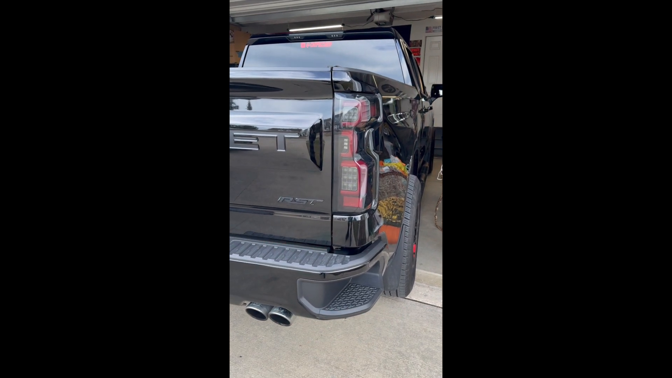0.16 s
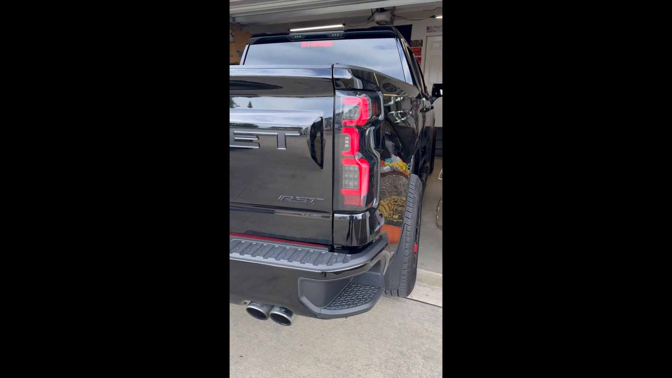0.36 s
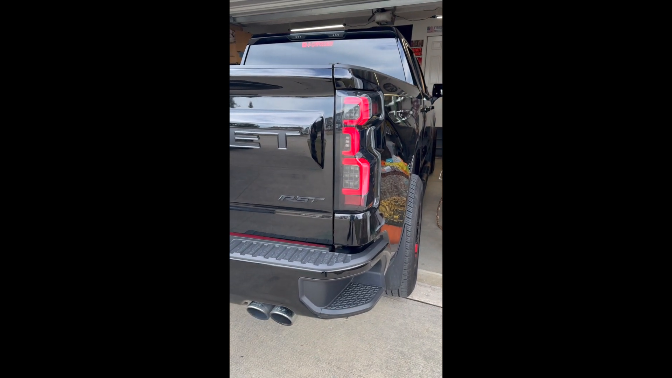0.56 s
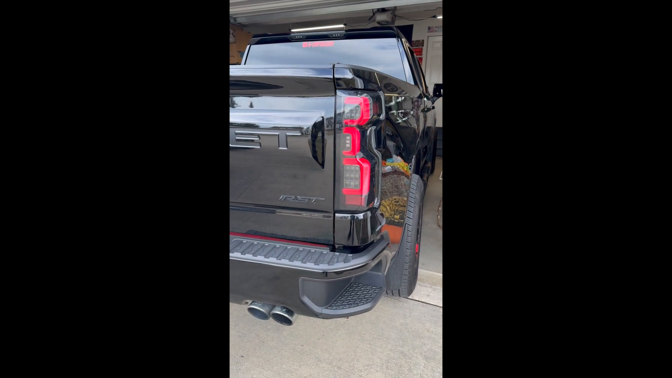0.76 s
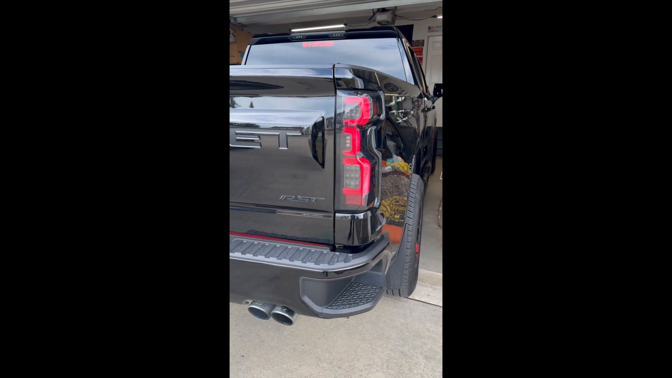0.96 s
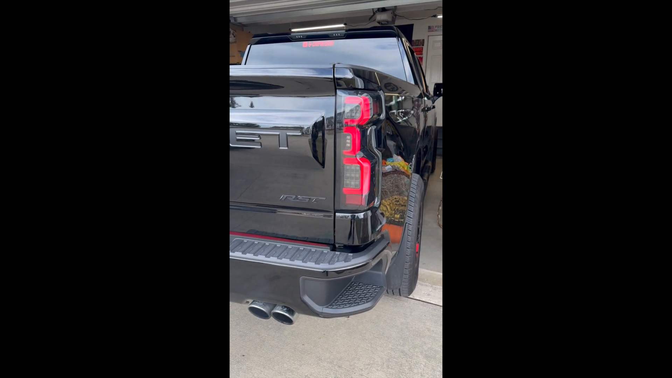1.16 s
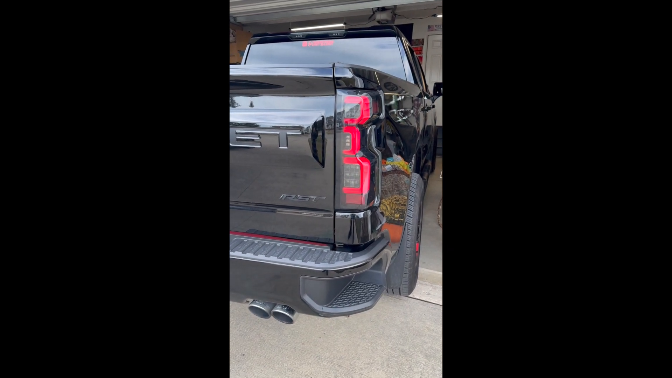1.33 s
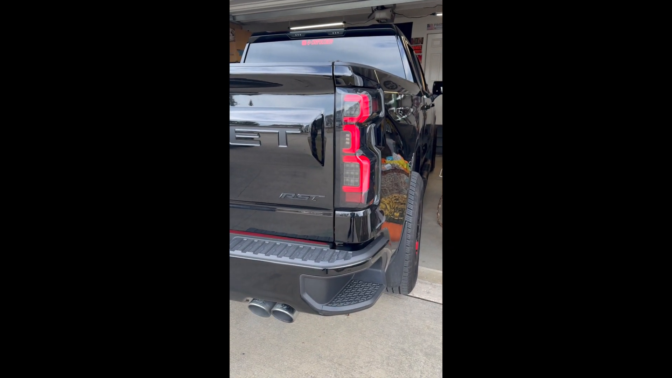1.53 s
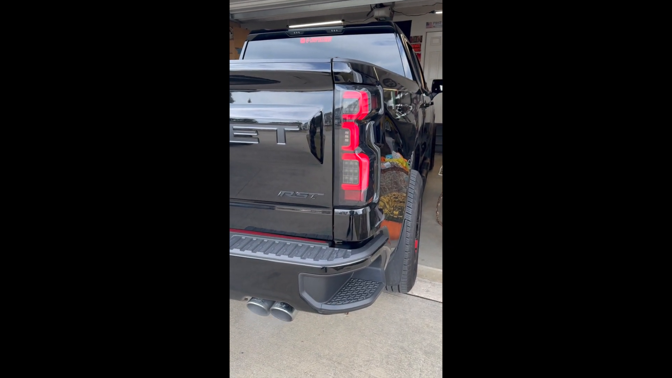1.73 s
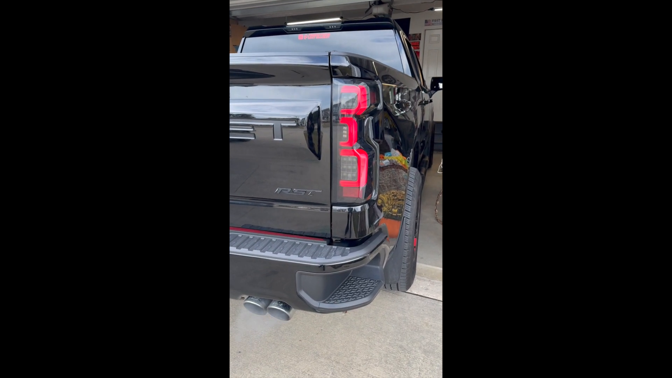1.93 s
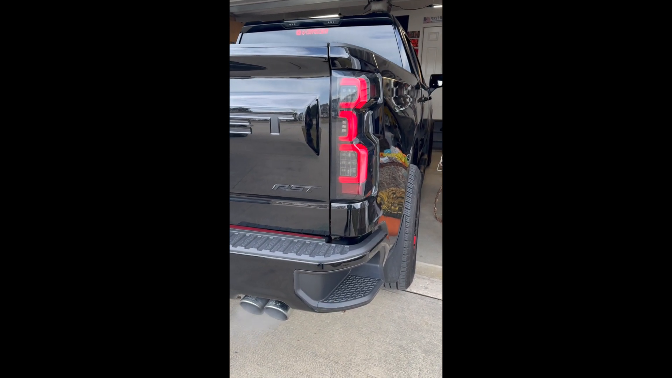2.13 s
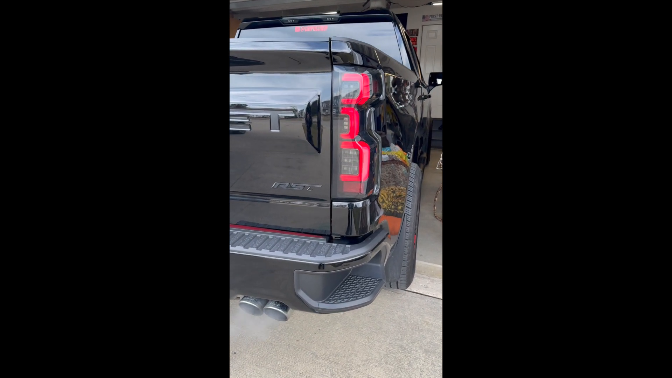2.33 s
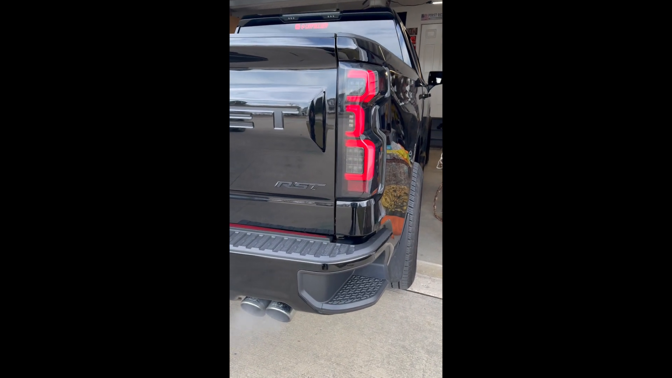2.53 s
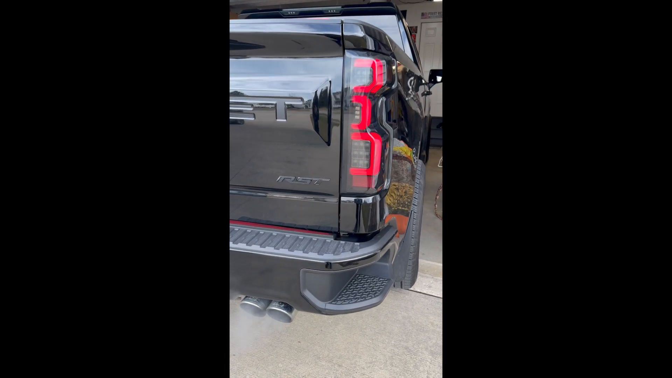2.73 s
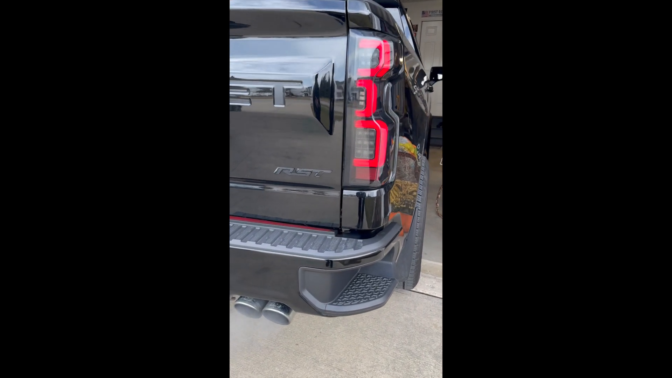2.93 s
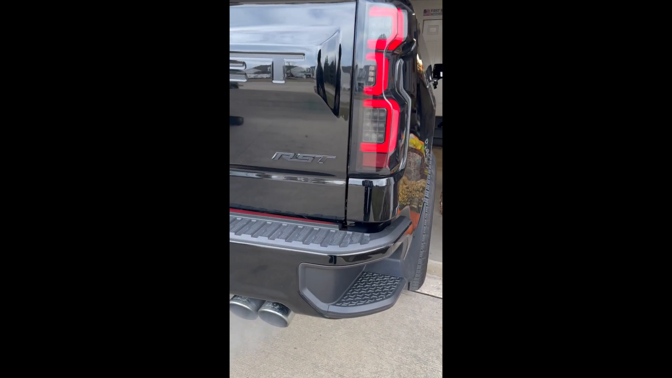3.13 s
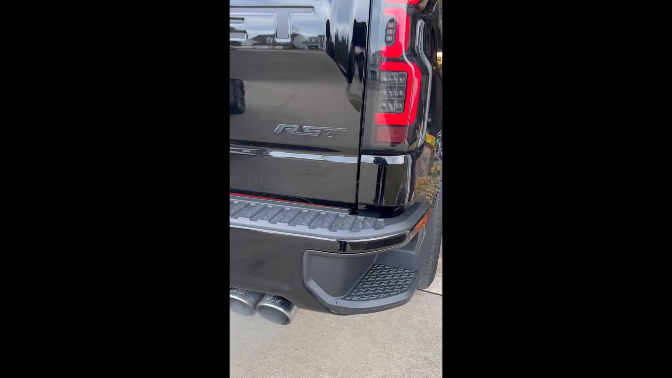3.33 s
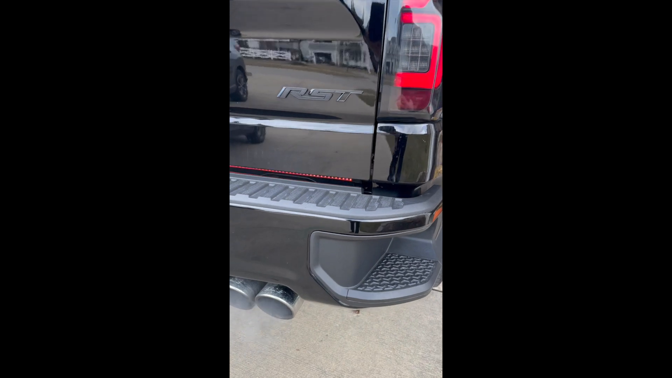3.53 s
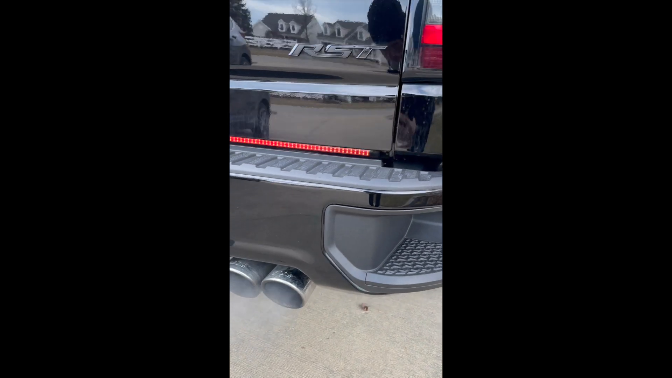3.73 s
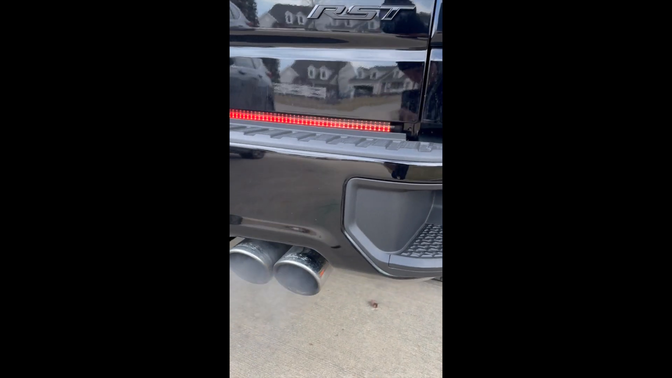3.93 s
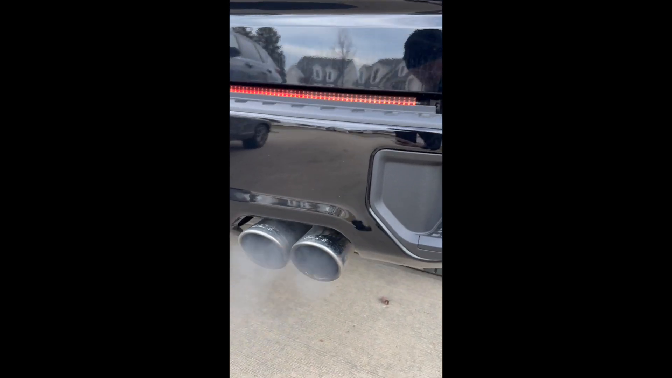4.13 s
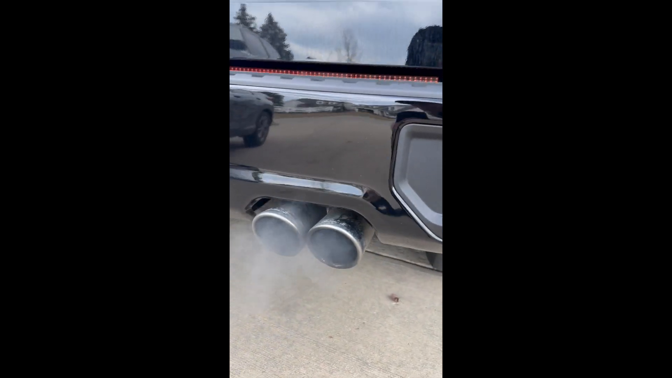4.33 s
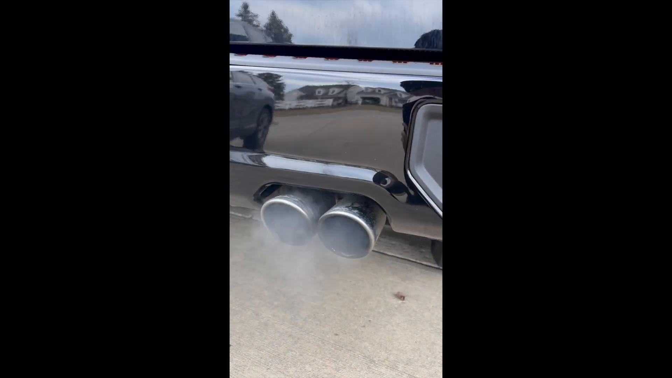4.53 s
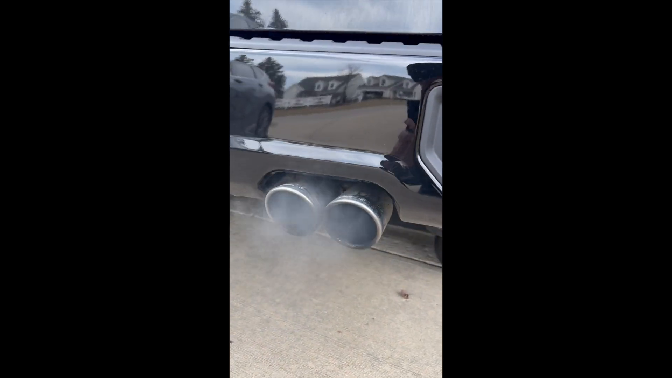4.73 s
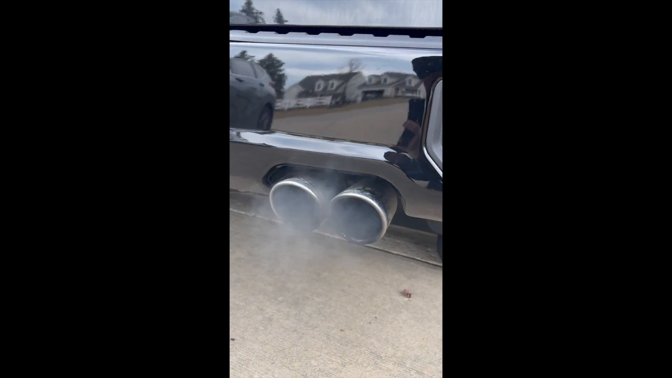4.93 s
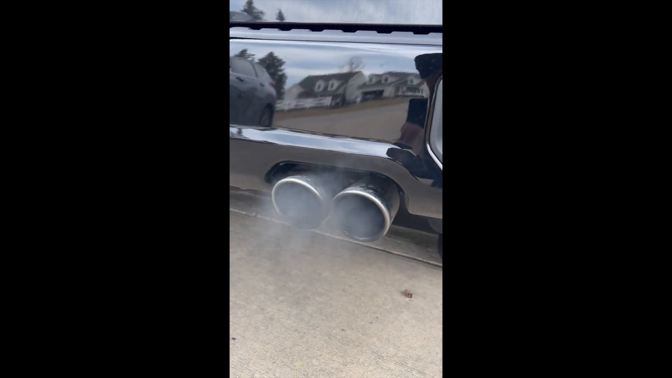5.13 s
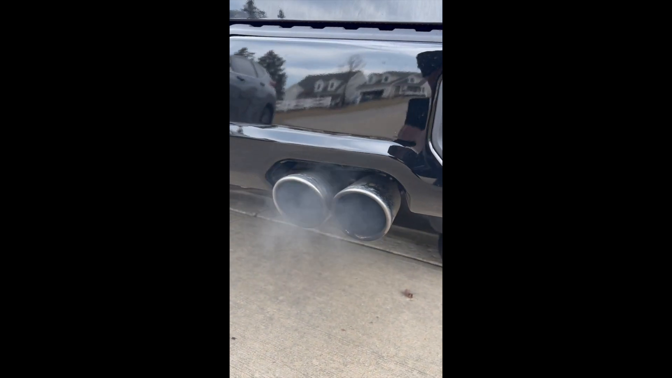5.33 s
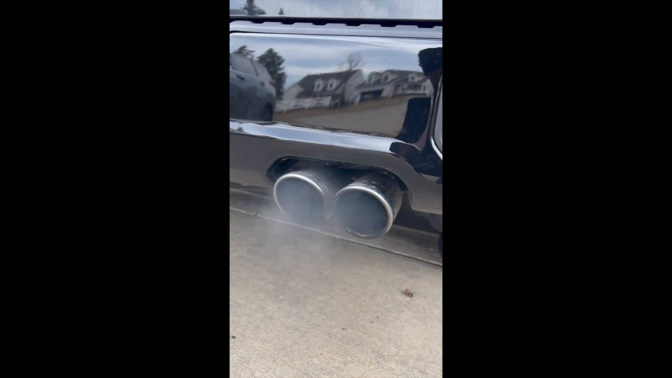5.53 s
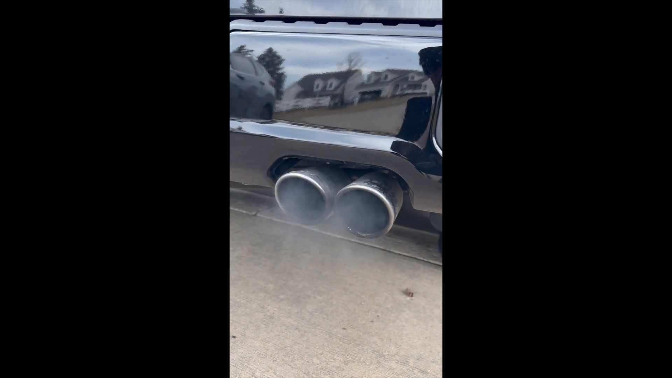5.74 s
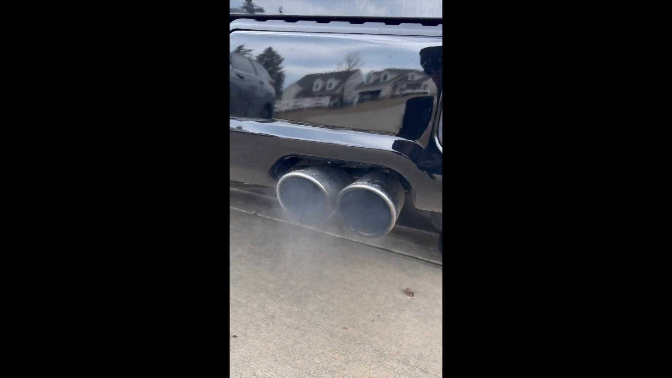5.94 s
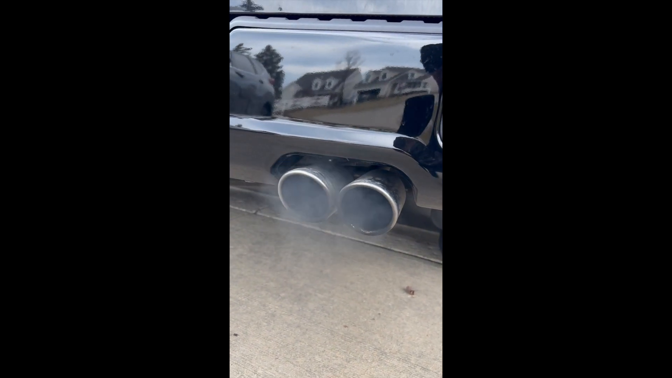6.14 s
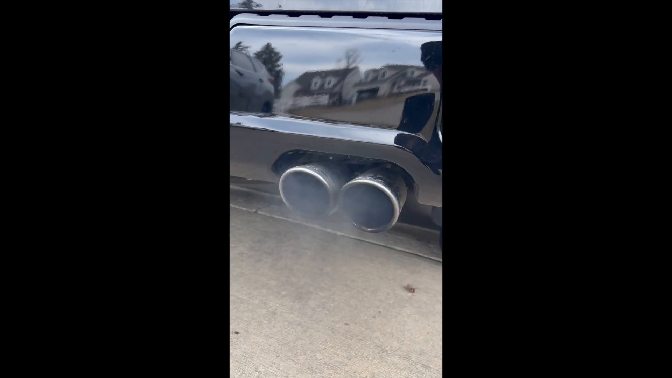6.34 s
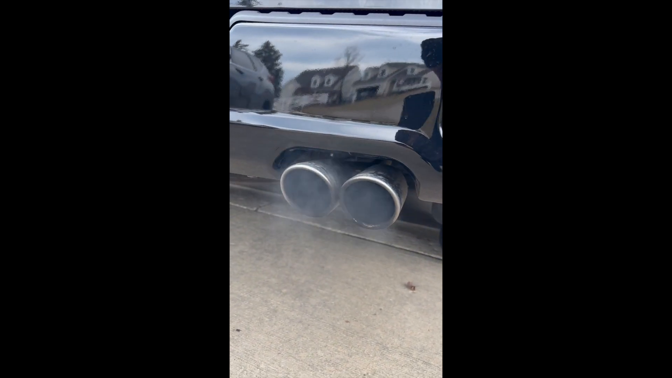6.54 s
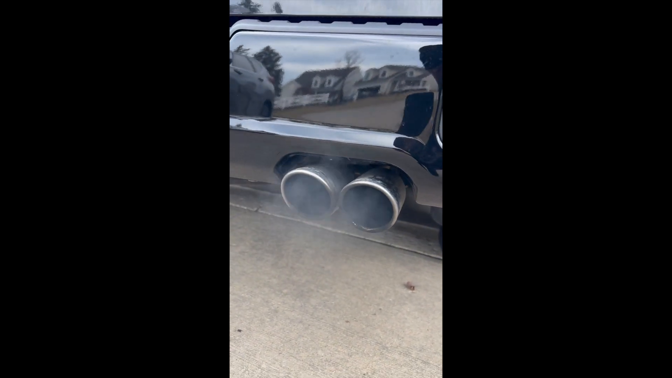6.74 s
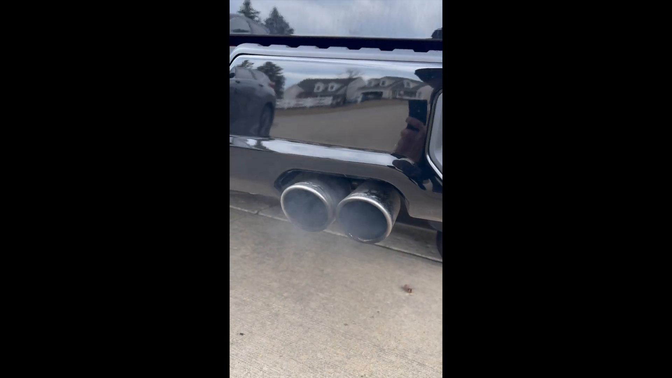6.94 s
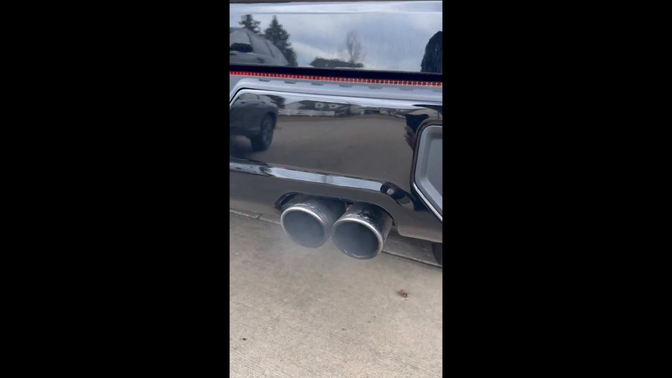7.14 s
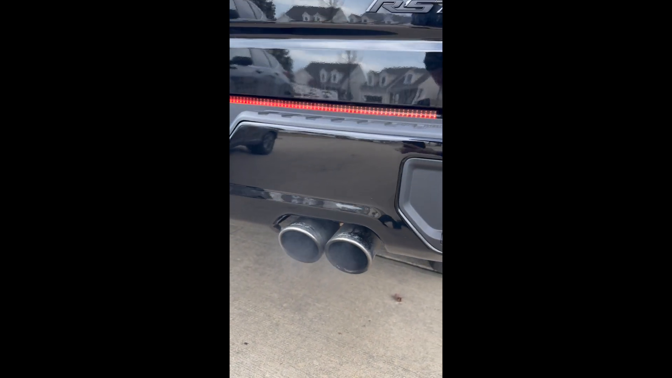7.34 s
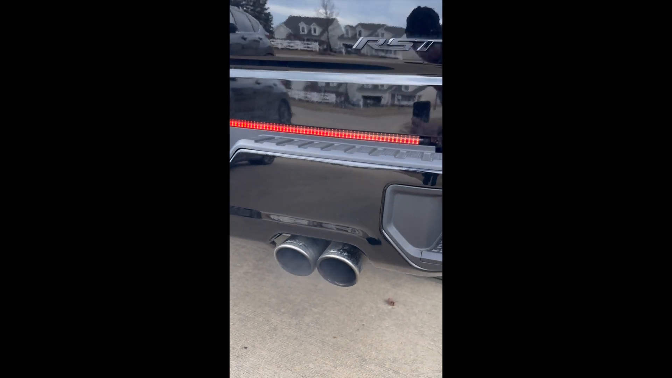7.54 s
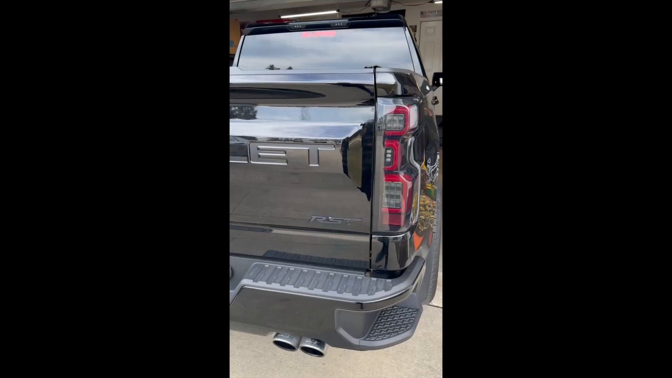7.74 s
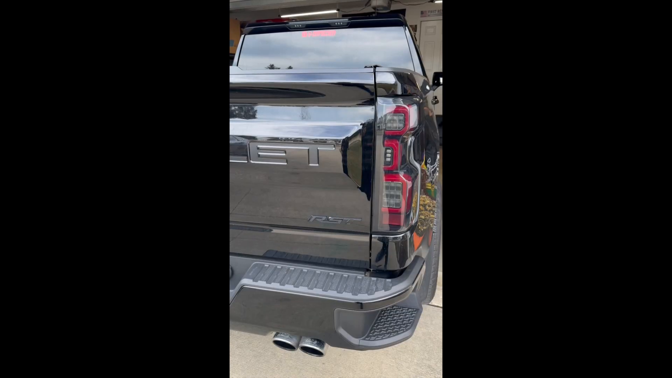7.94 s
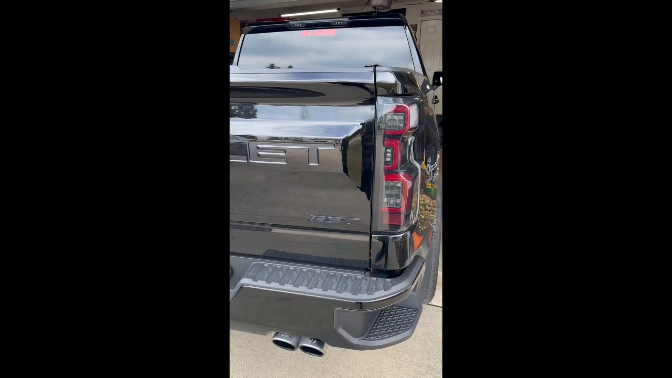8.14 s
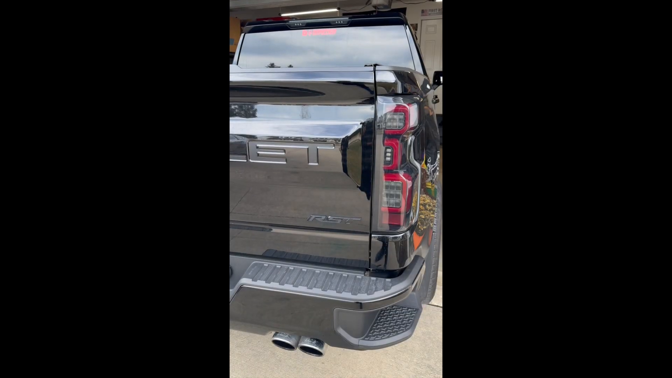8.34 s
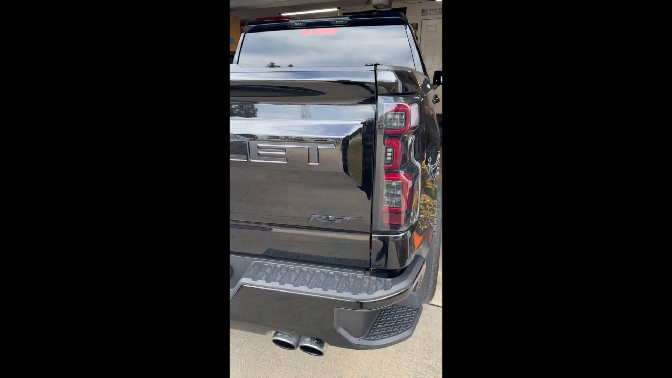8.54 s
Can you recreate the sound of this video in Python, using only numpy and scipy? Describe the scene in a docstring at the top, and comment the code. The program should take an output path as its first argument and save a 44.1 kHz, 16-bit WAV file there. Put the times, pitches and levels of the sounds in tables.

```python
"""A brief starter whirr, then a cold V8 catches, stumbles, flares and settles to a fast idle by an open
garage. Each firing strikes the twin tail pipes, which drone, bark and crack over deep tones; the gas
leaves in rasping, hissing puffs. The listener steps up to the pipes and back. At 7.7 s the engine sound
stops dead and only a low outdoor rumble is left."""
import sys
import numpy as np
from scipy import signal
from scipy.fft import rfft, irfft
from scipy.io import wavfile
from scipy.ndimage import uniform_filter1d

SR = 44100
rng = np.random.default_rng(int(sys.argv[2]) if len(sys.argv) > 2 else 0)


def wav_record(signal):
    """Record a signal, one row per channel, as 16-bit PCM in the file named by sys.argv[1]."""
    frames = np.transpose(np.atleast_2d(signal))
    bounded = np.clip(frames, -1, 1)
    # unit amplitude maps onto the largest positive 16-bit level
    quanta = np.round(bounded * 32767).astype(np.int16)
    wavfile.write(sys.argv[1], SR, quanta)


N = 382788
T = np.arange(N) / SR
HZ = np.maximum(np.arange(N // 2 + 1) * SR / N, 1)
CATCH_S, STOP_S = 0.085, 7.704
MEAN_BARK_DB, IDLE_SPREAD_DB, FLARE_SPREAD_DB = -20, .7, 1.5

# The crankshaft's rev and settle. Each row: time in seconds, speed in rpm.
CRANK_SPEED = [(0.08, 1333.6), (0.16, 1516.3), (0.26, 1569.7), (0.4, 1717.1), (0.55, 1750.6),
               (0.75, 1695.1), (1.08, 1604.4), (1.35, 1610.9), (1.6, 1615.2), (1.85, 1551.5), (2.3, 1528.8),
               (3, 1505.5), (3.7, 1484.8), (4.7, 1455.6), (5.15, 1458.3), (5.9, 1436.7), (6.6, 1418.4),
               (7.71, 1409.0)]
# The bark's fader ride: stumble, flare, walk up and back. Each row: time in seconds, level in dB.
BARK_RIDE = [(0.1, -17.5), (0.14, -12.5), (0.18, -10.5), (0.225, -19), (0.25, -11.5), (0.55, -16),
             (0.95, -20), (1.2, -25.5), (1.9, -27.5), (2.55, -26.5), (3.25, -23.5), (3.95, -18),
             (4.5, -16.5), (5.35, -18), (6.75, -20), (7.45, -24), (7.65, -27)]
# The blend of pipe colours. Each row: time in seconds, share of flare, share of close-up.
COLOUR_BLEND = [(.7, 1, 0.05), (1.2, 0.039, 0.37), (2.8, 0.31, 0.016), (4.1, 0.76, 0.54), (7.0, 0.21, 1),
                (7.7, 0.6, 0.63)]
# The stumbling first firings. Each row: start in seconds, dB over an idle firing.
CATCH_POPS = [(0.085, 7), (0.106, 2), (0.137, 4), (0.196, 6), (0.235, 9), (0.263, 5), (0.303, 0),
              (0.322, 1), (0.347, 8), (0.392, 2), (0.417, 5), (0.462, 1), (0.479, 4)]
# One entry per cylinder in firing order: its bank, 1 or 2; the shift in ms that its unequal pipe gives
# its pulse; its shift in ms at the hollow, long-ringing modes.
BANK = [1, 2, 2, 1, 2, 1, 1, 2]
HEADER_MS = [.8, -.3, .3, -.4, .4, .6, -1, .4]
HOLLOW_MS = [-4.2, -2.1, -3.1, -.4, -3.7, -1.5, -1.3, -.7]
# The pipe's ring. Each row: pitch in Hz, width in Hz, relative dB in the flare, from afar, close up.
PIPE_MODES = [(138.9, 14, 7, 5.5, 7.5), (175.8, 13, 10, 8.5, 6.5), (207.2, 5.4, 15, 4, -7.5),
              (242.4, 9.5, 7, -3, -4.5), (282.8, 9.9, 10.5, 12, 5.5), (345.6, 12, 12.5, 20, 14),
              (414.6, 13.4, 16, 22, 23), (496, 7.6, 18, 11, 23.5), (551.8, 17, 3.5, 12, 12.5),
              (620.4, 70, 1.5, 4, 7.5), (565, 43, 2, 9, 0.5), (725, 210, 1.5, 5.5, 5.5),
              (812, 71, 12.5, 17.5, 8.5), (915, 380, -4, 4.5, -15.5), (1318, 520, -6.5, 9, 0),
              (1360, 37, 2.5, 13.5, 11), (1493, 44, -10.5, -6, -0.5), (1895, 210, 0.5, 4, -12.5),
              (1956, 27, -10.5, -17, -2.5), (2280, 68, -18.5, -14, -14), (2684, 560, -16.5, -26.5, -17.5)]
# The second bank's push on the modes. Each row: pitch in Hz, drive from opposed (-1) to in step (1).
SECOND_BANK_DRIVE = [(130, -0.83), (280, -0.88), (490, -0.87), (700, 0.24), (1000, 1), (3000, 0.52)]
# Each cylinder's colour, far and close. Each row: pitch in Hz, then dB of the eight firings in turn.
CYLINDERS_FAR = [(256, -1, 5.2, -3, 3, 1, 3.0, -3.5, -1), (340, -2, 4, 1, -3, 2, 3, 0, -2),
                 (640, -2, 4, 1, -3, 2, 3, 0, -2), (900, -10, 8, 7, 2, -1, 5.5, -1, -2),
                 (1428, -5, 3.2, 10.5, -6, 0, -16.5, 12.5, 7), (2362, -10.5, 1.7, 3.5, -0.5, 1, 1, -2, -1),
                 (5157, -6, 0, -1, -2, 0, -1, -4.5, -6)]
CYLINDERS_CLOSE = [(256, 1, 5, 5, -1.5, -6, 3, -1, -1), (340, -3, 0, 3, -2, 4.5, -3.5, 3, -3),
                   (640, -3, 0, 3, -2, 4.5, -3.5, 3, -3), (960, -11, 9, 12, -1, -6, 3, -5, -9),
                   (1428, -9, 2, 4, 0, 3, -2, 8.5, 2), (2350, -7, 4.5, 1, -1.5, 5.5, 2, -1.5, -5.5),
                   (5157, -9, 8.5, -4, 2, 7, -4, 4.5, -6)]

# One entry per deep tone: its multiple of the cycle rate; its offset in dB at the catch; its share of
# the bark's swing in level.
TONE_MULTIPLES = [5, 7, 8, 10, 16, 21]
TONE_CATCH_DB = [1.5, -1.5, -13.5, -11, -7.5, -18.5]
TONE_FOLLOW = [0.27, 0.97, 0.7, 0.17, 0.93, 0.67]
# The pipe favours each tone at its own speed. Each row: speed in rpm, then dB of each tone at mean bark.
TONE_LEVELS = [(1430, -25.5, -33, -13, -48, -35, -26.5), (1413, -25, -36.5, -13.5, -55.5, -36, -25.5),
               (1485, -19.5, -25, -15.5, -46, -45.5, -31), (1565, -21, -22.5, -19, -35.5, -31, -39),
               (1494, -26.5, -26.5, -16.5, -30.5, -32, -32.5), (1680, -17, -28, -24, -40.5, -32, -35.5)]

# Where hollow thumps and brighter clacks fall. Each entry: place in the cycle in firing intervals.
THUMP_PLACES = [.05, 1.3, 1.82, 3.05, 5.0, 6.18, 7.0]
CLACK_PLACES = [1.63, 2.7, 3.7, 5.8, 7.0]
# Their shifting accents. Each row: time in seconds, delay in firing intervals, then peak dB at each place.
THUMP_ACCENTS = [(.7, -0.007, -15.5, -10, -10.5, -16.5, -23, -22, -12),
                 (1.2, -0.021, -22, -29.5, -12, -28, -17, -16.5, -28),
                 (1.999, -.03, -26.5, -31, -21, -28, -24, -25.5, -33.5),
                 (3.1, 0.056, -23.5, -21.5, -25, -29, -20.5, -19.5, -35),
                 (4.199, 0.036, -20, -10.5, -23, -22.5, -14.5, -13.5, -20),
                 (5.301, 0.031, -18, -12.5, -13, -16, -12.5, -15, -23.5),
                 (6.7, 0.0049, -20, -17.5, -25.5, -18.5, -22, -30.5, -18),
                 (7.6, 0.02, -31.5, -10.5, -32.5, -26.5, -18, -18.5, -24)]
CLACK_ACCENTS = [(.7, -0.0086, -17, -25, -27, -21.5, -28), (1.2, .01, -25, -31, -39, -29.5, -26),
                 (2.0, -.04, -27.5, -25, -30, -38, -29), (3.099, -0.005, -25, -25.5, -22, -27.5, -26.5),
                 (4.199, 0.13, -19.5, -17, -17.5, -20.5, -20), (5.3, 0.135, -16, -19.5, -19.5, -28.5, -29),
                 (6.7, .2, -24, -16, -20.5, -21, -28.5), (7.6, .22, -22.5, -24.5, -29.5, -30.5, -33)]
# The pipe modes they leave ringing. Each row: pitch in Hz, width in Hz, level in dB.
THUMP_TAIL = [(562, 14, -18)]
CLACK_TAIL = [(1012, 34, -7.5), (1103, 37, -15.5)]

# Noise colours. Each row: frequency in Hz, relative level in dB per Hz.
ROAR_COLOUR = [(15, -43), (25, -15.5), (81, -28), (117, -14.5), (147, -34), (216, -15.5), (263, -15.5),
               (382, -13.5), (600, -11.5), (780, -31), (1320, -120)]
RASP_CLOSE = [(530, -13), (900, -10.5), (1010, -8.5), (1170, -13.5), (1590, -9), (1730, -18), (1880, -10),
              (2120, -14.5), (3020, -13.5), (3260, -42.5), (3500, -42), (5500, -88.5)]
RASP_FAR = [(530, -19), (900, 2), (1090, -8), (1420, 1), (1630, -14.5), (1850, -2), (2080, -19), (2270, -4),
            (2600, -19), (2800, -8), (3500, -42.5), (5500, -91)]
HISS_COLOUR = [(2000, -34), (3400, 3), (3840, -0.5), (4350, 0.5), (4930, 0.5), (5800, 0.5), (6570, -2),
               (7650, -5.5), (9830, -10), (10300, -9)]
SIZZLE_OPPOSED = [(9900, -45), (10450, 0.5), (12900, -9), (15100, -9.5), (16000, -14)]
FAINT_TOP_BAND = [(13800, -50.5), (14500, -6), (15100, -1), (16000, -4.5)]
BAY_COLOUR = [(5000, -40), (7500, -4), (9000, -9), (10300, 7), (13400, -38)]
STARTER_COLOUR = [(24, -67), (40, 3.5), (649, -21), (696, -4.5), (764, -18.5), (878, -2), (1220, -16),
                  (1530, -10), (1720, -23.5), (2070, -14.5), (3010, -26.5), (6180, -23), (10300, -34.5)]
RUMBLE_COLOUR = [(15, -41), (25, -16.5), (55, 1), (95, 0.5), (139, -8), (254, -12.5), (281, -16.5),
                 (769, -28.5), (1310, -37.5), (1680, -50.5), (4720, -61), (6710, -54), (10300, -60),
                 (13400, -102.5)]
# The tips' faint whistle, lower as the ear comes round behind them.
# Each row: time in seconds, pitch in Hz, dB relative to the hiss.
TIP_WHISTLE = [(2.6, 4617, -24.5), (3.8, 4660, -4.5), (4.6, 4324, -9), (5.6, 4254, -8), (7.6, 4430, -9)]

# Slaps off ground, truck and garage. Each row: delay in ms, level in dB.
ECHOES = [(3.52, -15), (12.2, -15), (23, -6.5), (37, -14.5)]
# The stereo lean. Each row: frequency in Hz, left minus right in dB.
LEFT_LEAN = [(60, .5), (110, .7), (200, 1), (380, 2.4), (700, 6), (1290, 2.5), (2380, 1), (4400, 1.4),
             (8120, 0)]
# The stereo phase. Each row: frequency in Hz, left's lead in radians.
LEFT_LEAD = [(60, .05), (130, .05), (250, .25), (600, .5), (1210, .28), (2400, .5), (3300, .2), (5080, .2),
             (7060, -1.4), (10200, -2.7)]
# The EQ on the gas noise that widens the image. Each row: frequency in Hz, gain in dB.
SIDE_EQ = [(900, -22), (2000, -27.5), (4400, -2), (7000, -23), (10000, -8)]


def tail_pipes(at, cylinder, strength, pops):
    """Each firing strikes the pipe modes: low ones drone, middle ones bark, high ones crack."""
    flare, close = in_time(COLOUR_BLEND, at / SR)
    second_bank = np.array(BANK)[cylinder] == 2
    hollow_shift = ((np.array(HOLLOW_MS) - HEADER_MS)[cylinder] * SR / 1000).astype(int)
    drone_top_hz, bark_top_hz = 310, 1200
    bands = np.zeros((3, N))
    for k, (hz, width, flare_db, far_db, close_db) in enumerate(PIPE_MODES):
        db = far_db + flare * (flare_db - far_db) + close * (close_db - far_db)
        db += cylinder_db(hz, at, cylinder)
        db += rng.normal(0, 1, len(at)) * (IDLE_SPREAD_DB * (1 + hz / 2500) + FLARE_SPREAD_DB * flare)
        blows = pops.copy()
        blows[pops > 0] *= amp(flare_db + rng.normal(0, FLARE_SPREAD_DB, len(CATCH_POPS)))
        if 310 < hz < 660:  # the hollow modes
            blows[at + hollow_shift] += strength * amp(db)
        else:
            drive = np.where(second_bank, at_hz(SECOND_BANK_DRIVE, hz), 1)
            blows[at] += strength * amp(db) * drive
        r, w = np.exp(-np.pi * width / SR), 2 * np.pi * hz / SR
        ring = signal.lfilter([0, np.sin(w)], [1, -2 * r * np.cos(w), r * r], blows + 1e-18)
        bands[int(hz > drone_top_hz) + int(hz > bark_top_hz)] += (-1) ** k * width * ring
    for ms, db in ECHOES:
        lag = int(ms * SR / 1000)
        bands[:, lag:] += amp(db) * bands[:, :-lag]
    silencer = signal.cheby1(7, 1, [115, 3200], "band", fs=SR, output="sos")
    drone, bark, crack = [evened(band) for band in signal.sosfilt(silencer, bands)]
    return (drone * ride(-26.5, follow=.84, catch_db=4.3)
            + bark * ride(MEAN_BARK_DB - 4, follow=1, catch_db=0)  # tucked under the knocks
            + crack * ride(-34.5, follow=.53, catch_db=3.4))


def firings(cycle):
    """Eight exhaust pulses a cycle while the engine runs: the sample and cylinder of each."""
    count = np.floor(8 * cycle - .53 + 8).astype(int)  # pulses fall .53 of an interval in
    at = np.flatnonzero(np.diff(count)) + 1
    at = at[(at > CATCH_S * SR) & (at < STOP_S * SR)]
    cylinder = count[at] % 8
    return at + (np.array(HEADER_MS)[cylinder] * SR / 1000).astype(int), cylinder


def cylinder_db(hz, at, cylinder):
    """Each firing's accent at one pitch, blended from its far to its close colour."""
    def accents(rows):
        return np.array([at_hz(np.array(rows)[:, [0, k]], hz) for k in range(1, 9)])[cylinder]
    close = in_time(COLOUR_BLEND, at / SR)[1]
    far_db, close_db = accents(CYLINDERS_FAR), accents(CYLINDERS_CLOSE)
    return far_db + close * (close_db - far_db)


def deep_tones(cycle, rpm):
    """The even beat of all cylinders hums at multiples of eight; bank against bank gives the others."""
    crests = (np.arange(8) + .95) / 8  # in cycles
    bank_sign = np.where(np.array(BANK) == 1, 1, -1)
    in_step_rpm = {5: 1495, 7: 1630}  # the 5th and 7th fall behind as speed rises
    swing_db, unsettled = bark_swing_db(), after_catch(fade_s=.17)
    tones = np.zeros(N)
    for k, db, follow, catch_db in zip(TONE_MULTIPLES, in_time(TONE_LEVELS, rpm),
                                       TONE_FOLLOW, TONE_CATCH_DB):
        phase = np.angle(np.sum((bank_sign if k % 8 else 1) * np.exp(-2j * np.pi * k * crests)))
        lag_turns = .0013 * (rpm - in_step_rpm.get(k, rpm))
        db = db + follow * swing_db + catch_db * unsettled + k / 40 * drift(16)
        tones += np.sqrt(2) * amp(db) * np.cos(2 * np.pi * (k * cycle - lag_turns) + phase)
    return tones


def knocks(cycle, places, accents, tail, hz, width_hz):
    """The strongest pulses punch out of the pipe: a ring of a few waves, then a thin tail."""
    turns = np.arange(1, int(cycle[int(STOP_S * SR)]))[:, None]
    due_s = np.interp(turns + np.array(places) / 8, cycle, T)
    late, *levels = in_time(accents, due_s)
    db = np.array([level[:, k] for k, level in enumerate(levels)]).T
    db += rng.normal(0, 1.3, due_s.shape)
    peak_s = np.interp(turns + (places + late) / 8, cycle, T)
    rise_s, age = 1 / (np.pi * width_hz), T[:SR // 10]
    blows = np.zeros(N)
    blows[((peak_s - rise_s) * SR).astype(int)] = amp(db)
    knock = -age / rise_s * np.exp(1 - age / rise_s) * np.cos(2 * np.pi * hz * (age - rise_s))
    for tail_hz, tail_width, tail_db in tail:
        swell = (1 - np.exp(-age / rise_s)) * np.exp(-np.pi * tail_width * age)
        knock -= amp(tail_db) * swell * np.cos(2 * np.pi * tail_hz * (age - rise_s))
    return signal.oaconvolve(blows, knock)[:N]


def gas_roar():
    """The low rush of exhaust gas, riding under the bark."""
    return ride(MEAN_BARK_DB - 12.5, follow=1, catch_db=4) * noise(ROAR_COLOUR)


def puffs(at, sizes, pops, rise_ms, decay_ms, steady):
    """Gas speed at the tips: a swell at each firing that dies away, over a steady flow."""
    flow = pops.copy()
    flow[at] += sizes
    for ms in (rise_ms, decay_ms):
        r = np.exp(-1000 / (ms * SR))
        flow = signal.lfilter([1 - r], [1, -r], flow)
    return rms_one(flow / flow.mean() + steady)


def gas_rasp(at, cylinder, strength, pops):
    """Puffs of gas chug with the bark below 1200 Hz and spit unevenly above it; gives mid and side."""
    spit_sizes = amp(rng.normal(0, 1.3, len(at)) + cylinder_db(2400, at, cylinder))
    chug_sizes = strength * amp(cylinder_db(960, at, cylinder))
    spit = puffs(at, spit_sizes, pops, rise_ms=1.4, decay_ms=4, steady=.45)
    chug = puffs(at, chug_sizes, pops, rise_ms=1, decay_ms=6, steady=.5)
    low, high = [signal.butter(4, 1200, kind, fs=SR, output="sos") for kind in ("low", "high")]
    close = in_time(COLOUR_BLEND)[1]
    gases = [(1 - close) * noise(RASP_FAR) + close * noise(RASP_CLOSE) for _ in range(2)]
    gain = ride(-28.5, follow=.99, catch_db=4.2)
    return [gain * evened(signal.sosfilt(low, gas) * chug + signal.sosfilt(high, gas) * spit)
            for gas in gases]


def gas_hiss(flow):
    """The tips hiss and whistle in time with the flow; gives mid and side."""
    gain = ride(-47.5, follow=.97, catch_db=6.9)
    return [gain * evened((noise(HISS_COLOUR) + tip_whistle()) * flow) for _ in range(2)]


def tip_whistle(width_hz=360):
    """A breathy whistle at the tips: a narrow band of noise around a gliding pitch."""
    hz, db = in_time(TIP_WHISTLE)
    narrow = signal.butter(2, width_hz / 2, fs=SR, output="sos")
    flutter = signal.sosfilt(narrow, rng.standard_normal((2, N)))
    phase = 2 * np.pi * np.cumsum(hz) / SR
    return amp(db) * rms_one(flutter[0] * np.cos(phase) + flutter[1] * np.sin(phase))


def treble_sizzle(flow):
    """A gently pulsing sizzle, opposed left and right, and a very faint band near 15 kHz, alike in both."""
    treble = noise(SIZZLE_OPPOSED) * [[1], [-1]] + amp(-5) * noise(FAINT_TOP_BAND)
    return ride(-58.5, follow=.55, catch_db=6) * flow ** .5 * (T < STOP_S) * treble


def engine_bay():
    """Fan and belts add a thin hiss from up front."""
    return ride(-63.5, follow=.26, catch_db=4.8) * noise(BAY_COLOUR)


def starter():
    """The starter's fluttering whirr, gone as the engine catches."""
    fade = np.interp(T, [0, .006, .11, .16], [0, 1, 1, 0])
    return amp(-29.5 + .3 * drift(29)) * noise(STARTER_COLOUR) * fade


def outdoor_rumble():
    """A low, slightly wavering bed of outdoor noise."""
    return amp(-46.5 + drift(20)) * noise(RUMBLE_COLOUR)


def stereo(mid, side):
    """The mid leans in level and phase, the side is opposed; the top is left free for the sizzle."""
    half = amp(at_hz(LEFT_LEAN, HZ) / 2) * np.exp(.5j * at_hz(LEFT_LEAD, HZ))
    pan = np.array([half, 1 / half]) / np.abs(half + 1 / half) * 2
    pair = irfft(rfft(mid) * pan + rfft(side) * amp(at_hz(SIDE_EQ, HZ)) * [[1], [-1]], N)
    return signal.sosfilt(signal.cheby2(16, 60, 10700, fs=SR, output="sos"), pair)


def ride(db, follow, catch_db):
    """A layer's gain: db at mean bark, plus a share of the bark's swing and a push at the catch."""
    return amp(db + follow * bark_swing_db() + catch_db * after_catch(fade_s=.15))


def bark_swing_db():
    """How far the bark stands above its mean."""
    return in_time(BARK_RIDE)[0] - MEAN_BARK_DB


def after_catch(fade_s):
    """1 until the engine catches, then dying away."""
    return np.exp(-np.maximum(T - CATCH_S, 0) / fade_s)


def amp(db):
    """dB to gain."""
    return 10 ** (np.asarray(db) / 20)


def rms_one(x):
    """Scale to rms 1."""
    return x / np.sqrt(np.mean(x ** 2) + 1e-20)


def evened(x):
    """Hold the level at 1 over quarter seconds."""
    return x / np.sqrt(np.abs(uniform_filter1d(x ** 2, size=SR // 4)) + 1e-6 * np.mean(x ** 2))


def in_time(rows, where=T):
    """A table's curves read along its first column, by default at every sample's time."""
    axis, *columns = np.transpose(rows)
    return [np.interp(where, axis, column) for column in columns]


def at_hz(points, hz):
    """A spectrum table read on a log-frequency axis."""
    freqs, values = np.transpose(points)
    return np.interp(np.log(hz), np.log(np.maximum(freqs, 1)), values)


def noise(colour):
    """Noise of the given colour, rms 1."""
    return rms_one(irfft(rfft(rng.standard_normal(N)) * amp(at_hz(colour, HZ)), N))


def drift(rate):
    """A random wander of about unit size, turning rate times a second."""
    knots = np.arange(0, N / SR + 1, 1 / rate)
    return np.interp(T, knots, rng.standard_normal(len(knots)))


def scene():
    """The engine and its gas noise, led in by the starter, in stereo over the rumble."""
    rpm, = in_time(CRANK_SPEED)
    cycle = np.cumsum(rpm / 120) / SR  # two crank turns to a firing cycle
    at, cylinder = firings(cycle)
    strength = amp(rng.normal(0, IDLE_SPREAD_DB, len(at)))
    pops = np.zeros(N)
    for start_s, db in CATCH_POPS:
        pops[int(start_s * SR)] = amp(db)
    engine = tail_pipes(at, cylinder, strength, pops) + deep_tones(cycle, rpm)
    engine += knocks(cycle, THUMP_PLACES, THUMP_ACCENTS, THUMP_TAIL, hz=519, width_hz=250)
    engine += knocks(cycle, CLACK_PLACES, CLACK_ACCENTS, CLACK_TAIL, hz=988, width_hz=310)
    engine += gas_roar() + engine_bay()
    rasp_mid, rasp_side = gas_rasp(at, cylinder, strength, pops)
    hiss_sizes = strength * amp(cylinder_db(5500, at, cylinder))
    flow = puffs(at, hiss_sizes, pops, rise_ms=2.2, decay_ms=6.9, steady=.9)
    hiss_mid, hiss_side = gas_hiss(flow)
    running = np.clip((T - CATCH_S) / .002, 0, 1) * np.clip((STOP_S - T) / .0049 + .5, 0, 1)
    mid = (engine + rasp_mid + hiss_mid) * running + starter()
    side = (rasp_side + hiss_side) * running
    return stereo(mid, side) + outdoor_rumble() + treble_sizzle(flow)


def record(dry):
    """Soft saturation rounds the peaks; a steep low-pass cuts the very top."""
    top_cut = signal.cheby2(20, 60, 15800, fs=SR, output="sos")
    return signal.sosfilt(top_cut, 1.2 * np.tanh(dry / 1.15))


dry = scene()
out = record(dry)
wav_record(out)
```